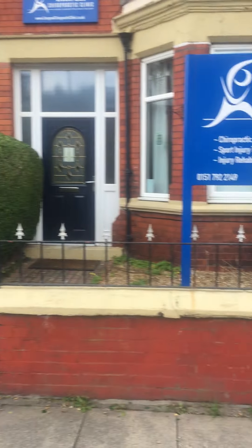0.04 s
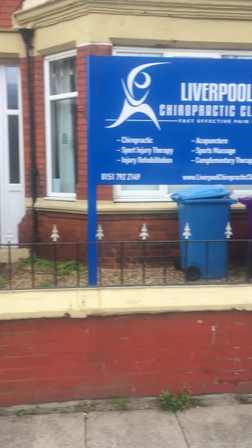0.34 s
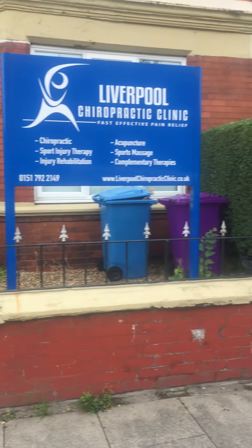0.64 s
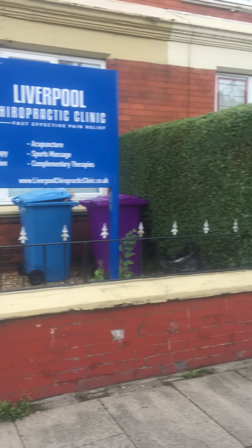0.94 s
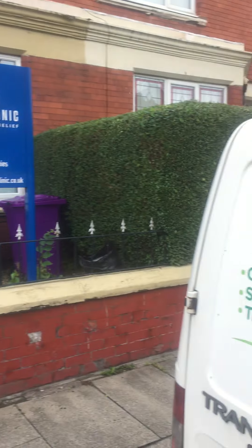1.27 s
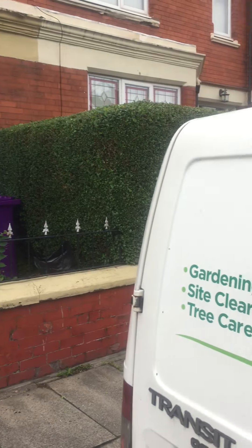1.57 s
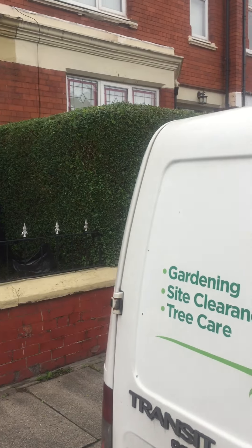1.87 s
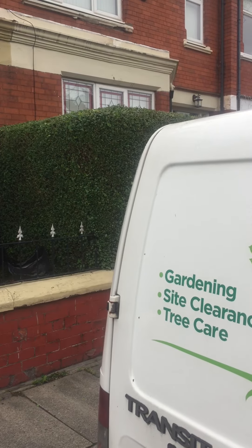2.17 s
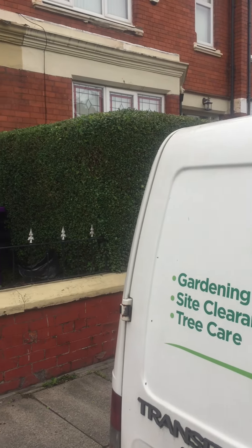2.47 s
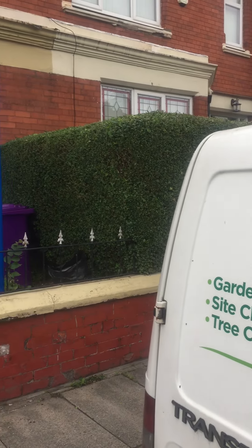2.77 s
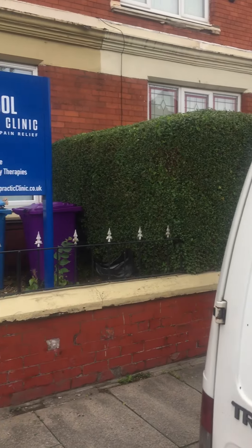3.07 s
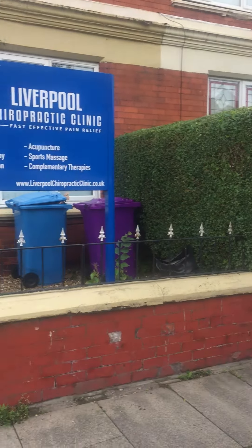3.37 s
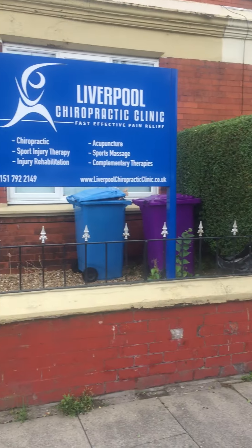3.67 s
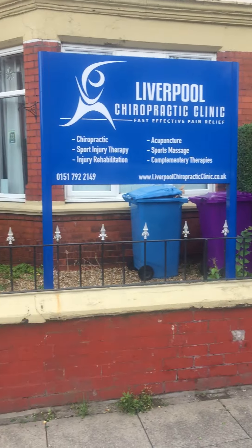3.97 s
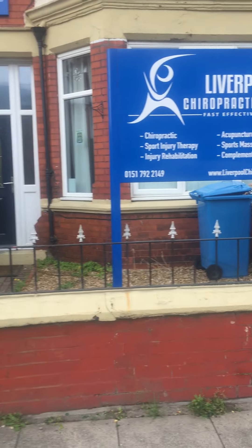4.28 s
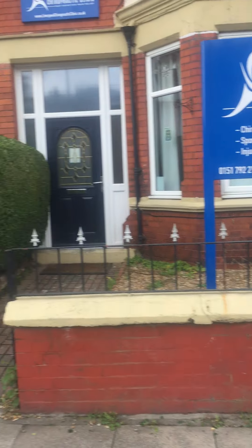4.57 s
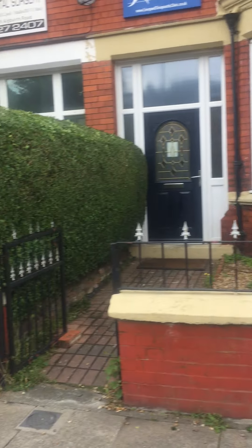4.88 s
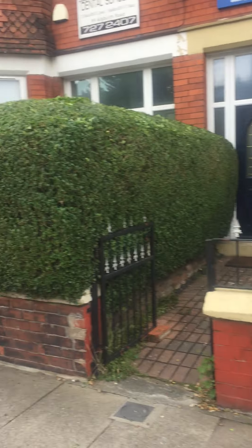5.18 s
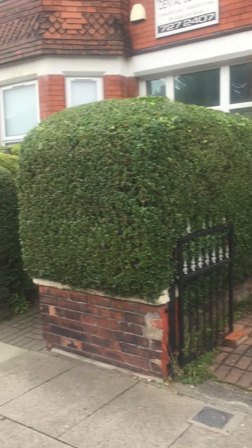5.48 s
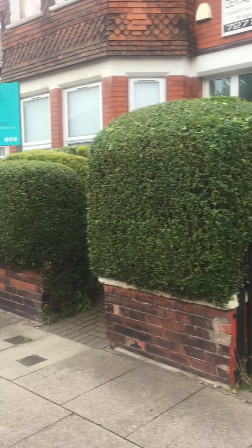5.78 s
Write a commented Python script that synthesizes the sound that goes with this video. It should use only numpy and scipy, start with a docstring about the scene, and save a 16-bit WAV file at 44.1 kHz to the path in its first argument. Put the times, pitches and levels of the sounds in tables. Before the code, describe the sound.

Steady road traffic with several cars passing in turn, a low engine drone and short gusts buffeting the microphone.

```python
"""Road traffic from the pavement of a terraced street, on a hand-held microphone.
Tyres roar on a road some way off, and five cars swell past in turn with tread rush, hiss and rumble;
the nearest adds a low engine note that sinks in pitch as it goes by. Gusts strike the microphone
port in clusters of short, low puffs. A faint bed of air and a few tiny ticks sit underneath."""
import sys
import numpy as np
from scipy import signal
from scipy.fft import rfft, irfft, next_fast_len
from scipy.io import wavfile
from scipy.ndimage import uniform_filter1d, map_coordinates

SR = 44100
rng = np.random.default_rng(int(sys.argv[2]) if len(sys.argv) > 2 else 0)


def bounce(signal):
    """Save signal as a 16-bit WAV file at the path given by the first command-line argument."""
    frames = np.transpose(np.atleast_2d(signal))
    limited = np.clip(frames, -1, 1)
    pcm = np.round(limited * 32767).astype(np.int16)
    wavfile.write(sys.argv[1], SR, pcm)


N = 265923

# tone colour of each noise layer: (f/Hz, relative level/dB)
AIR_EQ = [(100, -4), (3000, -2), (6000, 2), (7800, -1.5), (9600, 0.5), (10500, -10), (12000, -3),
          (15500, -9.5)]
TICK_EQ = [(2000, -26.5), (5000, -4), (8000, 2.5), (11000, -19), (15000, -20.5)]
BUFFET_EQ = [(15, -29), (30, -4.5), (50, 2), (100, 0.5), (160, -5), (230, -13.5), (330, -19), (500, -33.5),
             (900, -57), (2500, -105)]  # before the wind speed shifts its pitch
ROAR_EQ = [(200, -18), (420, -7.5), (540, -5), (640, -3.5), (780, -3.5), (930, 1.5), (1100, -2.5),
           (1400, -8), (2000, -20.5), (3200, -43.5), (6000, -72.5)]
TREAD_EQ = [(400, -19.5), (900, -9.5), (1250, -1.5), (1500, 0.5), (2000, -5), (2500, -14.5), (3200, -24.5),
            (5000, -57.5), (9000, -77.5)]
HISS_EQ = [(900, -16), (1700, 4.5), (2300, 10), (3200, 1.5), (4200, -4), (4900, -9), (6200, -10.5),
           (7500, -19), (9500, -25.5), (11000, -31), (15500, -41)]
RUMBLE_EQ = [(30, -37), (60, 0.5), (130, -6.5), (175, -0.5), (250, 1), (320, -3), (400, -3), (500, -16.5),
             (900, -16.5), (2500, -58.5)]

# tick cues: (t/s, level/dB)
TICK_CUES = [(1.48, -72), (3.065, -66), (4.815, -69), (4.95, -67)]
# gusts over the port: (start t/s, hold/s, level/dB)
GUST_CUES = [(.47, .12, -45), (.72, 0.341, -49), (1.101, .16, -41), (1.45, 0.48, -36.5), (1.675, .17, -28),
             (2.032, 0.16, -35.5), (2.651, .35, -29.5), (3.064, .18, -25.5), (3.32, 0.06976, -32),
             (4.962, 0.62, -45), (5.602, 0.48, -44.5)]
# the hardest puffs within the gusts: (peak t/s, level/dB, nominal half-length/s)
PUFF_CUES = [(1.205, -33, 0.0097), (1.501, -27, 0.015), (1.598, -29.5, 0.011), (1.678, -20, 0.008),
             (1.713, -18, .011), (1.798, -23.5, .012), (1.921, -29, .007), (1.941, -24.5, .011),
             (2.034, -26.5, 0.0079), (2.094, -28.5, 0.013), (2.137, -28.5, .014), (2.647, -25, 0.0072),
             (2.706, -23.5, 0.0085), (2.868, -25, 0.0098), (2.921, -24.5, 0.011), (3, -22.5, 0.0077),
             (3.063, -18, 0.0077), (3.109, -20, .013), (3.15, -19, 0.0072), (3.164, -17, 0.00603),
             (3.209, -15, 0.011), (3.241, -21.5, 0.0088), (3.378, -25, 0.01203), (3.498, -31.5, 0.014),
             (3.661, -33, 0.01), (4.972, -27, 0.0095), (5.026, -28.5, 0.016), (5.261, -29, 0.00913),
             (5.404, -34, .014), (5.491, -33, .009)]
# fader ride on the nearest engine: (t/s, level/dB)
ENGINE_FADER = [(0, -64), (3.8, -60), (4.22, -44.5), (4.8, -46.5), (5.4, -43.5), (6.03, -54)]
# partials of its exhaust note: (multiple of the firing rate, relative level/dB)
EXHAUST_ORDERS = [(1, 0.5), (2, -17), (3.5, -5.5), (4, -14.5), (5, -8)]
# pass-bys: (nearest t/s, time to drive the car's distance from the pavement/s,
# roar level/dB, tread level/dB, hiss level/dB, rumble level/dB)
PASS_BYS = [(1.2, 1.09, -46.5, -48.5, -68, -48), (2.55, 0.41, -40.5, -44, -57.5, -45),
            (3.58, 0.38, -43, -41.5, -50.5, -59), (4.03, 0.44, -39, -45.5, -52, -40.5),
            (5.921, 0.85, -36.5, -43.5, -53, -38)]
FAR_ROAD_DB = (-49, -60.5, -77, -59)  # roar, tread, hiss, rumble
FALLOFF = (1.36, 1.31, 1.28, 1.09)  # the same layers fade with these powers of distance


def amp(db):
    """Decibels to gain."""
    return 10 ** (np.asarray(db) / 20)


def unit(x):
    """Scale to rms 1."""
    return x / np.sqrt(np.mean(x ** 2) + 1e-20)


def wobble(rate):
    """A smooth random modulator, rate knots a second."""
    knots = rng.standard_normal(int(N * rate / SR) + 4)
    return map_coordinates(knots, [np.arange(N) * rate / SR], mode="nearest")


def filtered(x, response):
    """Filter x with a gain given as a function of frequency."""
    size = next_fast_len(len(x) + SR // 2)
    return irfft(rfft(x, size) * response(np.fft.rfftfreq(size, 1 / SR)), size)[:len(x)]


def coloured(x, eq):
    """x through an EQ curve drawn on a log frequency axis, at rms 1."""
    f, db = np.transpose(eq)
    return unit(filtered(x, lambda hz: amp(np.interp(np.log(hz + 1), np.log(f), db))))


def rush(eq, patchy_db):
    """Noise whose bands fade in and out, as sound does on its way through moving air."""
    bands = signal.stft(rng.standard_normal(N), nperseg=1024)[2]
    patches = uniform_filter1d(rng.standard_normal(bands.shape), size=6, axis=0)  # across frequency
    patches = unit(uniform_filter1d(patches, size=12, axis=1))  # across time
    noise = signal.istft(bands * amp(patchy_db * patches), nperseg=1024)[1][:N]
    return coloured(noise, eq)


def air_bed():
    """A faint, even hiss behind everything."""
    return amp(-78) * rush(AIR_EQ, patchy_db=2.5)


def ticks(width_s=0.0016):
    """A few faint, bright ticks of noise close to the microphone."""
    t = np.arange(N) / SR
    envelope = sum(amp(db) * np.exp(-.5 * ((t - s) / width_s) ** 2) for s, db in TICK_CUES)
    return envelope * coloured(rng.standard_normal(N), TICK_EQ)


def wind_force(breeze_db=-53, attack_s=0.00796, release_s=0.01414, flutter_db=3.5):
    """Pressure on the port: a fluttering breeze, gusts that rise, hold and drop, and puffs on top."""
    t = np.arange(N) / SR
    power = amp(breeze_db) ** 2
    for start, hold, db in GUST_CUES:
        fade = np.maximum(start - t, 0) / attack_s + np.maximum(t - start - hold, 0) / release_s
        power += (amp(db) * np.exp(-fade)) ** 2
    power *= amp(flutter_db * wobble(45)) ** 2
    for peak, db, half_length in PUFF_CUES:
        width = half_length * np.where(t < peak, .62, .8)  # a puff arrives faster than it leaves
        power += amp(db) ** 2 * np.exp(-.5 * ((t - peak) / width) ** 2)
    return np.sqrt(power)


def wind_buffet(calm_hz=74.04, hz_per_force=1000.4, hz_per_energy=11990, build_up_s=.045):
    """Eddies sweep the port: the harder and longer it blows, the faster they go and higher they sound."""
    force = wind_force()
    pole = np.exp(-1 / (build_up_s * SR))
    energy = signal.lfilter([1 - pole], [1, -pole], force ** 2)
    eddy_hz = calm_hz + hz_per_force * force + hz_per_energy * energy
    eddies = coloured(rng.standard_normal(2 * N), BUFFET_EQ)
    speed = eddy_hz / 120  # varispeed: the eddies sit at 120 Hz at speed 1
    pressure = map_coordinates(eddies, [np.cumsum(speed)], order=1, mode="wrap")
    # compress the eddies' own swings, so the force of the wind sets most of the punch
    eddy_power = uniform_filter1d(np.abs(signal.hilbert(pressure)) ** 2, size=600)
    envelope = uniform_filter1d(np.sqrt(eddy_power), size=300)
    return force * unit(pressure / envelope ** 0.73)


def engine(firing_hz=50.34, doppler_share=0.04, nearest_s=4.0, passing_s=0.49):
    """A slow-running engine drones and sinks in pitch as it passes; each exhaust order wavers alone."""
    t = np.arange(N) / SR
    fader_db = np.interp(t, *np.transpose(ENGINE_FADER))
    along_road = (t - nearest_s) / passing_s
    heard_hz = firing_hz * (1 - doppler_share * along_road / np.hypot(1, along_road))
    heard_hz *= 1 + 0.01986 * wobble(17)  # slight pitch waver
    phase = 2 * np.pi * np.cumsum(heard_hz) / SR
    exhaust = sum(amp(db + 3.5 * wobble(17)) * np.sin(order * phase + 0.42 * wobble(25))
                  for order, db in EXHAUST_ORDERS)
    return amp(fader_db) * exhaust


def traffic():
    """Cars swell and fade with distance: tyres roar and hiss, air rushes from treads, engines rumble."""
    t = np.arange(N) / SR
    power = amp(FAR_ROAD_DB)[:, None] ** 2
    for nearest_s, passing_s, *levels_db in PASS_BYS:
        distance = np.hypot(1, (t - nearest_s) / passing_s)  # 1 at the nearest point
        swell = amp(levels_db)[:, None] / distance ** np.array(FALLOFF)[:, None]
        power = power + swell ** 2
    roar, tread, hiss, rumble = np.sqrt(power)
    return (roar * rush(ROAR_EQ, patchy_db=1.2) + tread * rush(TREAD_EQ, patchy_db=1.5)
            + hiss * rush(HISS_EQ, patchy_db=2.5) + rumble * rush(RUMBLE_EQ, patchy_db=3.0))


def scene():
    """Mono mix: traffic, the nearest engine, wind and ticks over the bed of air."""
    return (air_bed() + traffic() + engine() + wind_buffet() + ticks())[None]


def record(dry):
    """The microphone sheds the deepest bass and keeps nothing above its band limit."""
    low_cut_hz, top_hz = 39, 15750
    return filtered(dry[0], lambda hz: (hz < top_hz) * hz ** 4 / np.hypot(hz ** 4, low_cut_hz ** 4))[None]


dry = scene()
out = record(dry)
bounce(out)
```